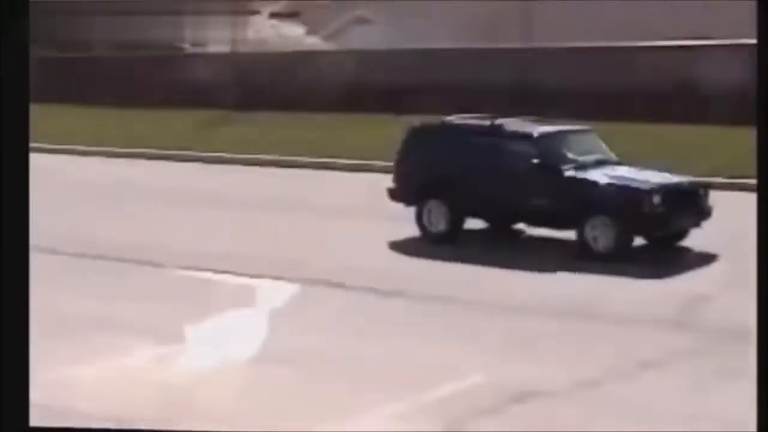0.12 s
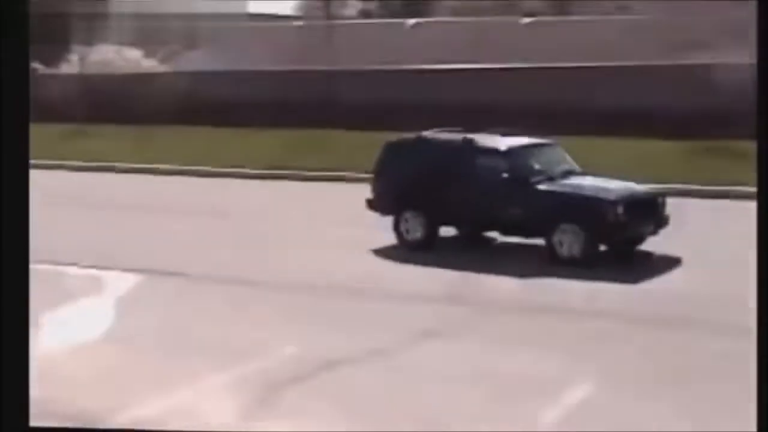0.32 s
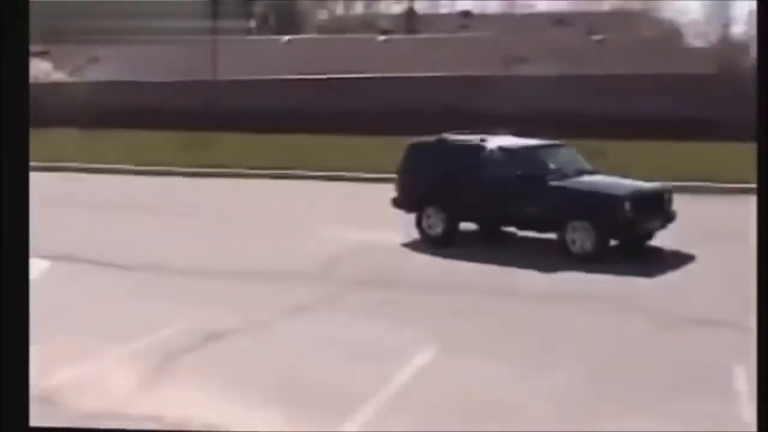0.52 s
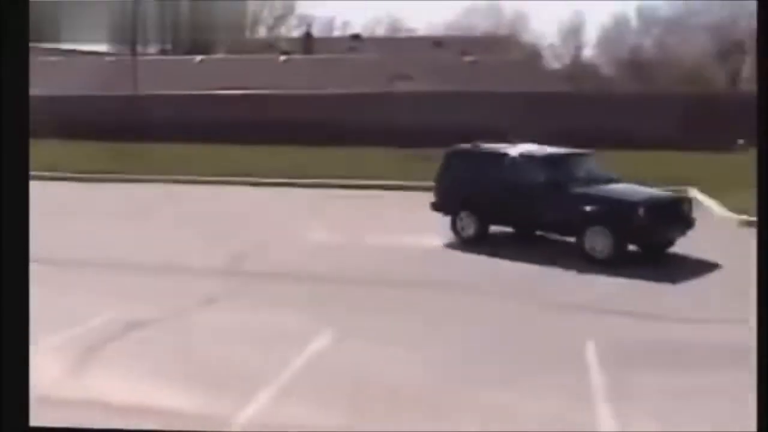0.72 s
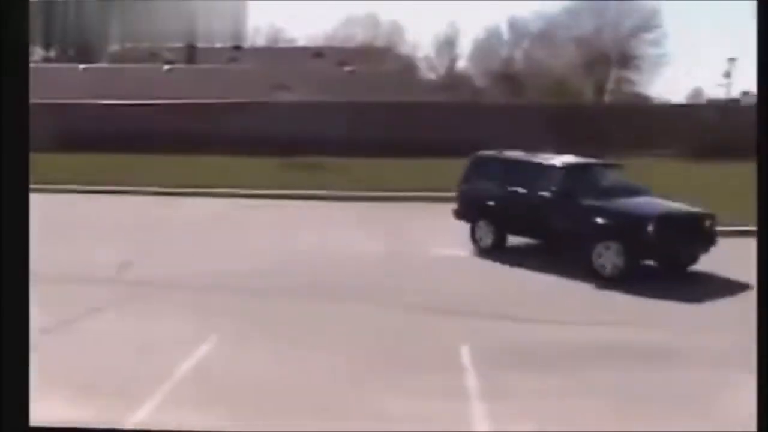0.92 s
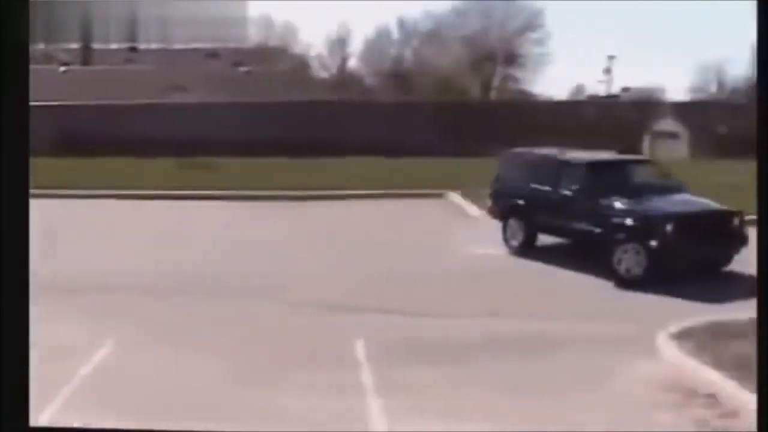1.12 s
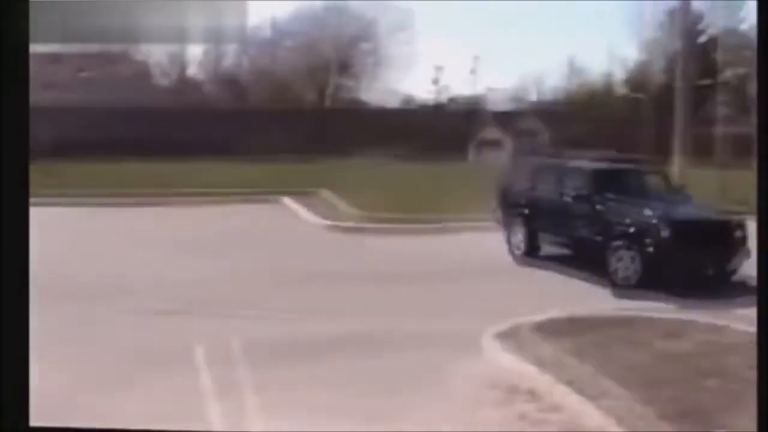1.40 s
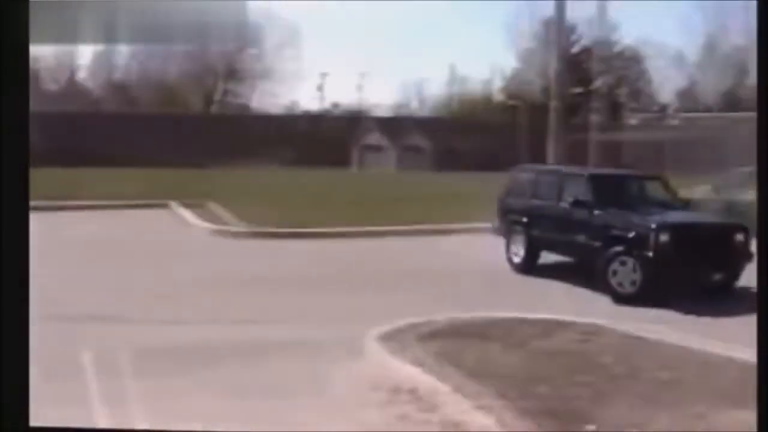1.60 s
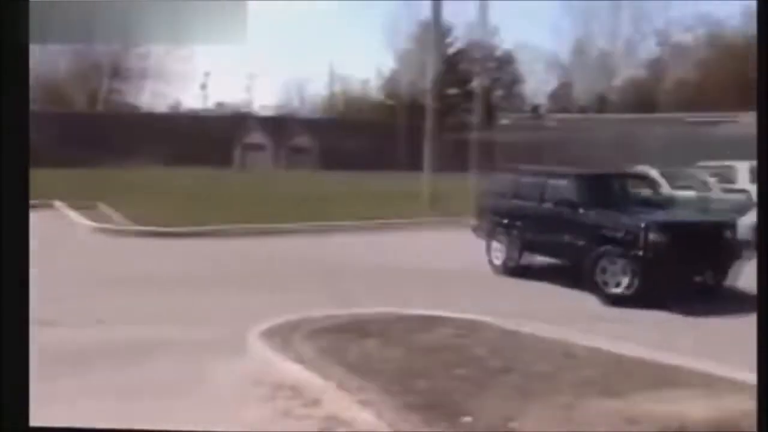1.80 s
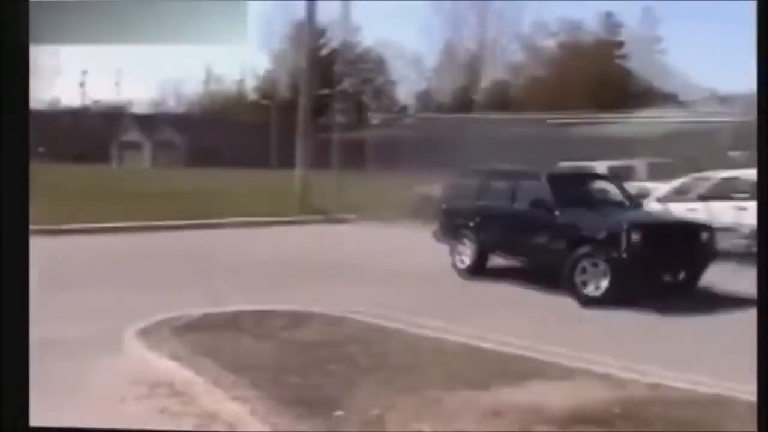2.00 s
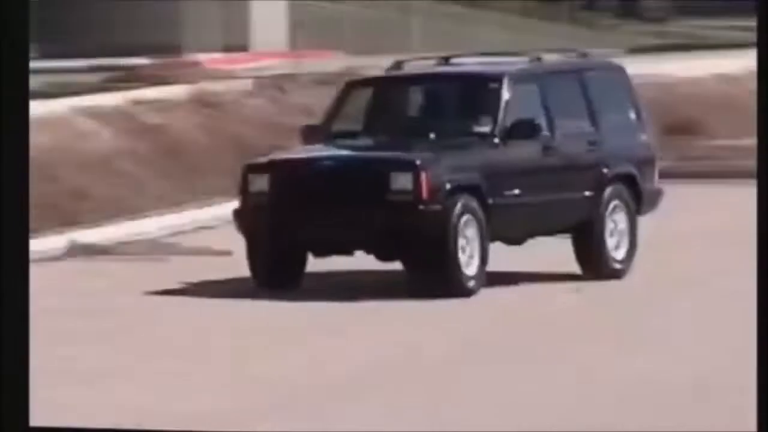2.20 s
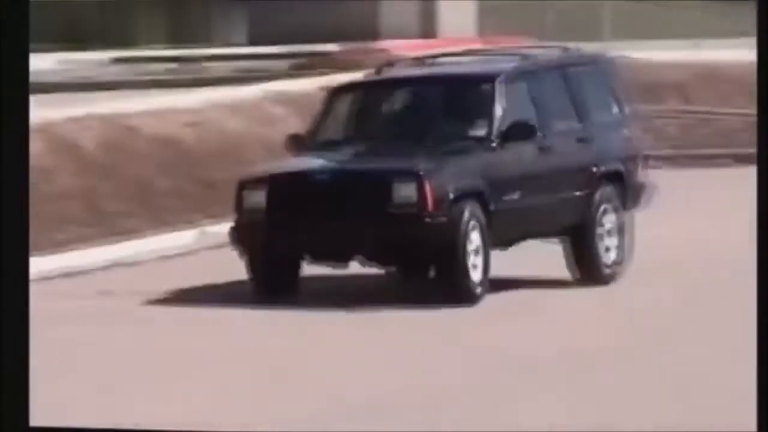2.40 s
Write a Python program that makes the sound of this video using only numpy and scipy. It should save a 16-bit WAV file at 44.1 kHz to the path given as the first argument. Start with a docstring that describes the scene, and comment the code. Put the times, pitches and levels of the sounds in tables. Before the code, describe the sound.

Tyres screech close by on outdoor asphalt, starting with a high yelp and growing rougher as a second tyre joins in bursts. A quiet engine revs underneath before the squeal stops abruptly and is briefly heard from afar.

```python
"""A car slides round a bend in a car park

Blocks of tyre tread stick and slip: one tyre sings a wavering squeal and another joins in bursts, over
scrubbing rubber, a few ticks, road rumble and an engine that revs up. The close sound starts and stops
abruptly, and the scene then changes briefly to a place filled with a ringing noise."""
import sys
import numpy as np
from scipy import signal
from scipy.fft import rfft, irfft
from scipy.io import wavfile
from scipy.ndimage import uniform_filter1d

SR = 44100
rng = np.random.default_rng(int(sys.argv[2]) if len(sys.argv) > 2 else 0)


def master(y):
    """Save y as 16-bit WAV."""
    cut = np.clip(np.atleast_2d(y).T, -1, 1)
    pcm = np.round(cut * 32767)  # scale
    wavfile.write(sys.argv[1], SR, pcm.astype(np.int16))


N = 114660
TIME = np.arange(N) / SR


def amp(db):
    """Turn decibels into a gain."""
    return 10 ** (np.asarray(db) / 20)


def evened(x):
    """Scale to an average power of one."""
    return x / np.sqrt(np.mean(x ** 2) + 1e-20)


def level_at(colour, hz):
    """Look up a table's level at any frequency."""
    f, db = np.transpose(colour)
    return np.interp(np.log(hz + 1), np.log(f + 1), db)


def shaped(x, colour):
    """Filter a sound by a table of frequencies and levels."""
    return irfft(rfft(x) * amp(level_at(colour, np.fft.rfftfreq(N, 1 / SR))), N)


def curves(table):
    """A curve for each column, and a gate that is open from the first time to the last."""
    times, *columns = np.transpose(table)
    gate = np.clip(np.minimum(TIME - times[0], times[-1] - TIME) / .008 + 1, 0, 1)
    return [np.interp(TIME, times, c) for c in columns], gate


def wander(rate_hz):
    """A smooth random wobble, up to about the given rate."""
    lowpass = signal.butter(4, rate_hz, fs=SR, output="sos")
    return evened(signal.sosfilt(lowpass, rng.standard_normal(N + 8000))[8000:])


def noise(colour, patchy_db, flicker_db, treble_db=None):
    """Noise whose level wavers in patches of frequency and flickers as a whole."""
    frames, hz = N // 128 + 6, np.fft.rfftfreq(512, 1 / SR)
    real, imag, patch = rng.standard_normal((frames, 257, 3)).T
    patch = evened(uniform_filter1d(uniform_filter1d(patch, size=5, axis=0), size=16, axis=1))
    flicker = evened(uniform_filter1d(rng.standard_normal(frames), size=8))
    db = level_at(colour, hz)[:, None] + patchy_db * patch + flicker_db * flicker
    if treble_db is not None:
        share = np.clip(np.log(hz / 1700 + 1e-9) / np.log(3.6), 0, 1)[:, None]
        db += share * treble_db[np.minimum(np.arange(frames) * 128, N - 1)]
    return evened(signal.istft((real + 1j * imag) * amp(db), nperseg=512, noverlap=384)[1][:N])


def air():
    """A faint, even rush of outdoor air."""
    # tone of the air (frequency [Hz], relative level [dB])
    colour = [(300, -33), (450, -9.5), (8300, -44), (12000, -69)]
    return noise(colour, patchy_db=1.5, flicker_db=.6) * amp(-49)


def rumble():
    """Lumpy road and body noise, with deep bass that dies away as the car moves off."""
    # swell of the rumble (time [s], level [dB])
    swell = [(0.0, -48), (0.38, -42), (0.73, -52), (1.41, -53), (1.75, -41), (2.2, -45), (2.36, -42),
             (2.6, -44.5)]
    # its tone (frequency [Hz], relative level [dB])
    colour = [(30, -18.5), (100, -10), (190, -0.5), (330, 0), (420, -3.5), (600, -24.5), (1000, -83.5)]
    (db,), _ = curves(swell)
    body = evened(shaped(rng.standard_normal(N), colour))
    deep = wander(rate_hz=120) * amp(-54 - 13 * TIME)
    return body * amp(db + wander(9.1)) + deep


def roll(end_s=.33):
    """The dull roar of rolling tyres that still grip."""
    # tone of the tread (frequency [Hz], relative level [dB])
    colour = [(180, -37), (300, -34), (606, 0.5), (742, -0.5), (1050, -3), (1260, -5), (3000, -42),
              (6600, -120)]
    fade = np.clip((end_s - TIME) / .094, 0, 1)
    return noise(colour, patchy_db=1, flicker_db=0) * amp(-33.5) * fade


def scrub():
    """Rubber rasps over asphalt, mixed with a noisy ring of the squeal near 620 Hz."""
    # swell of the mix, brightest as the tread bites (time [s], relative level [dB], relative treble [dB])
    swell = [(0.06, -41, -18.5), (0.15, -39, -15), (0.21, -43.5, -13.5), (0.265, -28.5, -10.5),
             (0.295, -34, -9.5), (0.315, -28, -8), (0.36, -26.5, -8), (0.395, -32, -7.5),
             (0.44, -27, -12.5), (0.585, -31.5, -10.5), (0.61, -34, -12), (0.77, -33, -10.5),
             (0.95, -32.5, -17.5), (1.22, -31.5, -19.5), (1.46, -28.5, -19.5), (1.69, -30.5, -17),
             (2.14, -27, -20), (2.32, -27, -21)]
    # broad rasp plus the squeal's ring (frequency [Hz], relative level [dB])
    colour = [(60, -58), (130, -42), (480, -35.5), (620, -0.5), (800, -7), (1240, -7.5), (1670, -9),
              (2350, -12), (2700, -17), (5870, -34.5), (9800, -49), (14000, -54)]
    (db, treble_db), _ = curves(swell)
    return noise(colour, patchy_db=1.93, flicker_db=.92, treble_db=treble_db + 21.5) * amp(db + 5)


def ticks(decay_s=.005):
    """Tiny bright ticks, like grit thrown by the tread."""
    # ticks (time [s], peak level [dB])
    hits = [(0.0974, -36), (0.167, -30), (0.2353, -36), (0.768, -33)]
    out, t = np.zeros(N), np.arange(600) / SR
    band = signal.butter(2, [4900, 7700], "band", fs=SR, output="sos")
    for start, db in hits:
        burst = signal.sosfilt(band, rng.standard_normal(600) * np.exp(-t / decay_s))
        out[round(start * SR):][:600] += amp(db) * burst / abs(burst).max()
    return out


def slip(hz, partials_db, jitter, shimmer_db, fuzz):
    """Rubber sticks and slips: a shaky tone whose partials (multiples of the pitch) are partly noise."""
    phase = 2 * np.pi * np.cumsum(hz * (1 + jitter * wander(55))) / SR
    out = np.zeros(N)
    for k, db in partials_db:
        halo = (wander(55 * k) + 1j * wander(55 * k)) / np.sqrt(2)
        noisy = np.clip(fuzz * k ** 2, 0, .95)
        body = np.sqrt(1 - noisy) * amp(shimmer_db * wander(40)) + np.sqrt(noisy) * halo
        out += amp(db) * np.sqrt(2) * (body * np.exp(1j * k * phase)).real
    return out


def bite():
    """A high yelp as the tread first bites."""
    # the yelp (time [s], pitch [Hz], level [dB])
    yelp = [(.235, 1012, -30), (.26, 1026, -26), (.268, 1030, -8), (.284, 976, -20), (.29, 1187, -9.5),
            (.305, 1084, -20.5), (.325, 1073, -28), (.4, 928, -19.5), (.46, 897, -30.5)]
    (hz, db), gate = curves(yelp)
    return gate * slip(hz, [(1, db), (2, db - 32)], jitter=.014, shimmer_db=.5, fuzz=.2)


def squeal():
    """The tyre that bears the load sings, and grows rougher as it slides."""
    # the squeal (time [s], pitch [Hz], level [dB], octave level [dB], swarm against main tone [dB])
    song = [(.32, 805.6, -26, -51, -4), (.36, 791.7, -18.5, -45, -2), (.415, 754.6, -19.5, -48, -2.5),
            (.45, 779.5, -20, -50, 2), (.53, 759, -13, -34, -8.5), (.545, 856, -16, -39, 5.5),
            (.575, 782, -13.5, -23.5, -11), (.61, 758, -13, -27, -10), (.685, 763, -16.5, -26.5, 0),
            (.705, 720.4, -21.5, -34, 6), (.73, 749.7, -16.5, -30.5, -3), (.8, 754.8, -17, -26, -9),
            (.95, 731.7, -18.5, -27, 0), (1.0, 699.8, -17, -41, -1), (1.11, 613.6, -18.5, -29, -12),
            (1.25, 570.7, -13.5, -26, -23), (1.33, 590.7, -21.5, -29, -5.5), (1.5, 590, -26, -48, -6.5),
            (1.6, 627.7, -21, -51, -4.5), (1.69, 641.5, -26, -56, -6), (1.78, 567, -28.5, -27, 1),
            (1.8, 589.4, -39.5, -30, -0.5), (1.83, 612.5, -23, -33, -4.5), (1.875, 627, -30, -33, -1),
            (1.93, 617, -29.5, -35.5, 2.5), (1.99, 661, -23, -31, -6.5), (2.07, 633.7, -21.5, -31, -11),
            (2.12, 648.6, -24, -26, -18.5), (2.2, 697.5, -33.5, -28, -13.5), (2.24, 666, -20.5, -26.5, -20),
            (2.31, 702, -31.5, -28.5, -16), (2.33, 702, -30.5, -48, -5)]
    # its roughness (time [s], fuzz [0-1], upper partials against octave [dB], shimmer [dB])
    roughness = [(.3, .3, -22, 2), (.58, .05, -22, 1), (1.2, .13, -20, 1.5), (1.6, .25, -12, 2.5),
                 (2.33, .3, -3, 3)]
    (hz, db, octave_db, swarm_db), gate = curves(song)
    (fuzz, upper_db, shimmer_db), _ = curves(roughness)
    partials = [(1, db), (2, octave_db), (3, octave_db + upper_db), (4, octave_db + upper_db - 1)]
    tone = slip(hz, partials, jitter=.0045, shimmer_db=shimmer_db, fuzz=fuzz)
    return gate * (tone + amp(db + swarm_db) * swarm(hz))


def swarm(hz, slips_per_s=320, cycles=18):
    """Other tread blocks slip for a few cycles each, mostly a little above the main pitch."""
    out = np.zeros(N)
    for when, above, glide, size, offset in rng.random((int(slips_per_s * N / SR), 5)):
        at = int(when * N)
        pitch = hz[at] * (.95 + .45 * above ** 1.55)
        progress = np.arange(0, 1, pitch / (cycles * SR))
        phase = 2 * np.pi * (cycles * (progress + .036 * (glide - .5) * progress ** 2) + offset)
        swell = amp(2.8 * size) * np.sin(np.pi * progress) ** 2
        grain = swell * (np.sin(phase) + .2 * np.sin(2 * phase))
        out[at:at + len(grain)] += grain[:N - at]
    return evened(out)


def chirps():
    """Single tread blocks slip with short, gliding chirps."""
    # slips (start [s], length [s], first pitch [Hz], last pitch [Hz], level [dB])
    slips = [(.37, .2, 1720, 1600, -29), (.668, .026, 880, 1000, -24), (1.025, .07, 612, 570, -24),
             (1.08, .081, 1290, 1331, -28), (1.361, .025, 801, 700, -24), (1.491, .035, 701, 850, -25),
             (1.878, .028, 650, 740, -20), (1.961, .08, 721, 741, -25), (2.061, .06, 1501, 1580, -30),
             (2.19, .07, 730, 745, -27)]
    out = np.zeros(N)
    for start, length, from_hz, to_hz, db in slips:
        t = np.arange(0, length, 1 / SR)
        hz = (from_hz + (to_hz - from_hz) * t / length) * (1 + .013 * wander(45)[:len(t)])
        swell = amp(db) * np.sqrt(2 * np.sin(np.pi * t / length))
        out[round(start * SR):][:len(t)] += swell * np.sin(2 * np.pi * np.cumsum(hz) / SR)
    return out


def second_tyre():
    """Another tyre squeals in bursts, loudest an octave above its base pitch."""
    # the bursts (time [s], octave pitch [Hz], octave level [dB])
    bursts = [(1.33, 1439, -43), (1.354, 1527, -23), (1.404, 1356, -23.5), (1.525, 1470, -23),
              (1.59, 1364, -23.5), (1.668, 1467, -27.5), (1.7, 1328, -47)]
    (hz, db), gate = curves(bursts)
    return gate * slip(hz / 2, [(1, db - 5), (2, db)], jitter=.012, shimmer_db=2.5, fuzz=.06)


def engine():
    """The engine's low note climbs as it fires faster."""
    # the rev (time [s], firing rate [Hz], level [dB])
    rev = [(1.6, 81.76, -58), (1.976, 130.7, -45), (2.33, 165, -57.5)]
    # its partials (multiple of firing rate, relative level [dB])
    partials = [(1, -1.5), (2, -11), (3, -9)]
    (hz, db), gate = curves(rev)
    phase = 2 * np.pi * np.cumsum(hz) / SR
    tone = sum(amp(part_db + .91 * wander(6.1)) * np.sin(k * phase) for k, part_db in partials)
    return gate * amp(db) * np.sqrt(2) * tone


def far_engine():
    """A distant engine hums one sinking note."""
    # the hum (time [s], pitch [Hz], level [dB])
    hum = [(2.28, 321.4, -52), (2.318, 307, -41), (2.6, 286, -53)]
    (hz, db), gate = curves(hum)
    return gate * amp(db) * np.sqrt(2) * np.sin(2 * np.pi * np.cumsum(hz) / SR)


def next_scene_noise():
    """After the scene changes, a ringing noise fills the new place."""
    # swell of the ringing noise (time [s], level [dB])
    swell = [(2.35, -37), (2.522, -33.5), (2.6, -28.5)]
    # its tone (frequency [Hz], relative level [dB])
    colour = [(240, -36.5), (400, -28), (547, -23), (596, 1), (677, -13.5), (748, -3.5), (815, -5),
              (6420, -40.5), (6890, -52), (12000, -60)]
    (db,), _ = curves(swell)
    return noise(colour, patchy_db=1.5, flicker_db=1) * amp(db)


def echoes(x):
    """A wavering copy stands for echoes off asphalt and fences, which differ left and right."""
    # stereo width (frequency [Hz], relative echo level [dB])
    width = [(60, -17), (400, -30), (600, -13.5), (1000, -8), (2800, -13), (4000, -18), (7000, -8),
             (14000, -13.5)]
    # echoes grow as the car swings round (time [s], gain [dB])
    widening = [(0, -14.5), (1.0, -6.5), (1.5, 2), (2.3, -2), (2.35, -16), (2.6, -43)]
    shifting = (signal.hilbert(x) * (wander(25) + 1j * wander(25))).real / np.sqrt(2)
    (db,), _ = curves(widening)
    side = shaped(shifting, width) * amp(db)
    return np.array([x + side, x - side])


def scene(start_s=.055, stop_s=2.327, edge_s=.0035):
    """The close sound cuts off with a quick fade, and the scene changes to a ringing noise."""
    near = np.clip(np.minimum(TIME - start_s, stop_s - TIME) / edge_s + .5, 0, 1)
    late = TIME > 1  # keeps the fade and the next scene's ringing noise out of the opening
    quick_fade = amp(-11 - 60 * np.maximum(TIME - stop_s, 0) / .098) * late
    tyres = squeal() + bite() + second_tyre() + chirps() + ticks() + scrub() + roll()
    close = tyres * np.maximum(near, quick_fade)
    later = next_scene_noise() * (1 - near) * late
    return echoes(close + later + air() + rumble() + engine() + far_engine())


def record(dry, limit=.3, bass_hz=25, treble_hz=10050, top_hz=14050):
    """A quick limiter eases the loud swells; filters trim the deepest bass and highest treble."""
    drive = np.sqrt(abs(uniform_filter1d(dry ** 2, size=120))) / limit + 1e-9
    soft = dry * np.tanh(drive) / drive
    soft = signal.sosfilt(signal.butter(2, bass_hz, "high", fs=SR, output="sos"), soft)
    dull = signal.oaconvolve(soft, signal.firwin(301, treble_hz, fs=SR)[None], "same")
    mix = dull + amp(-20) * (soft - dull)  # a little treble leaks through
    return signal.oaconvolve(mix, signal.firwin(511, top_hz, window=("kaiser", 9), fs=SR)[None], "same")


dry = scene()
out = record(dry)
master(out)
```